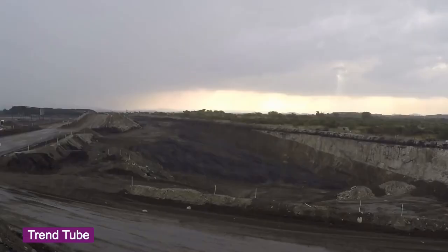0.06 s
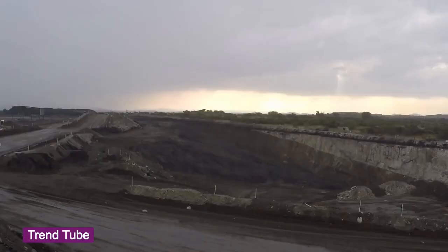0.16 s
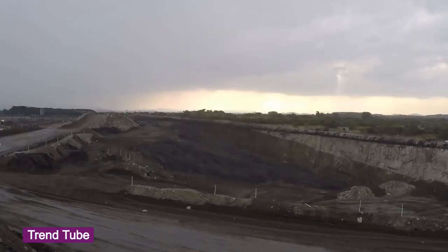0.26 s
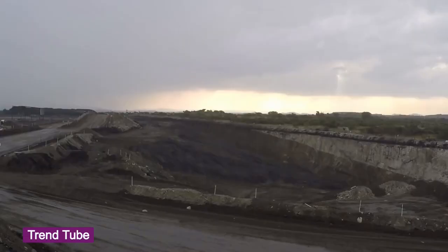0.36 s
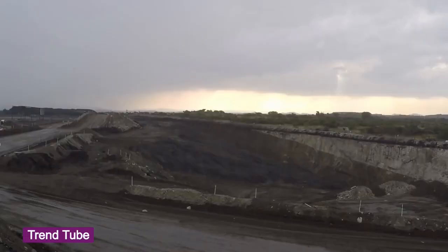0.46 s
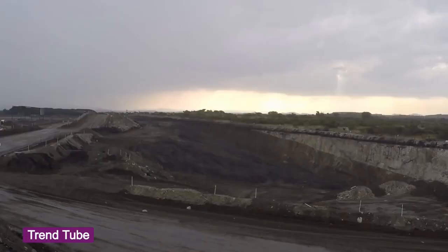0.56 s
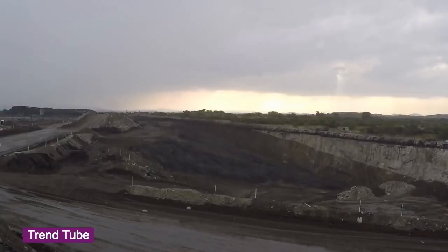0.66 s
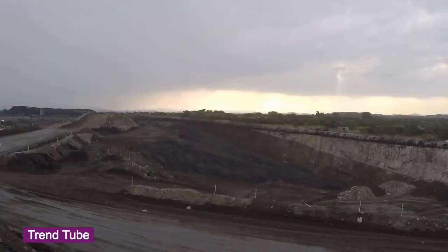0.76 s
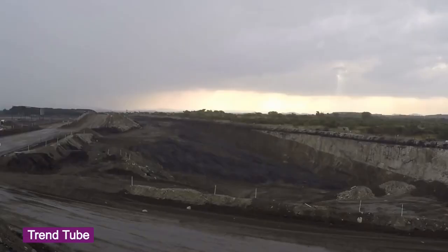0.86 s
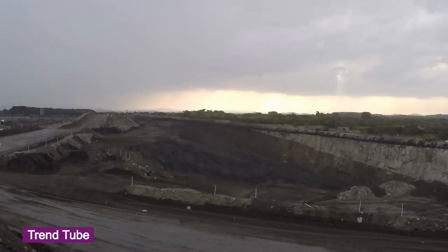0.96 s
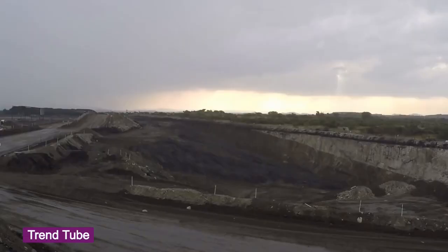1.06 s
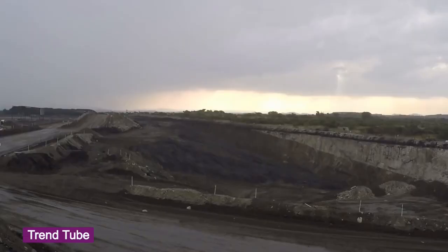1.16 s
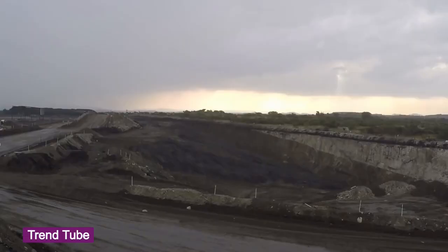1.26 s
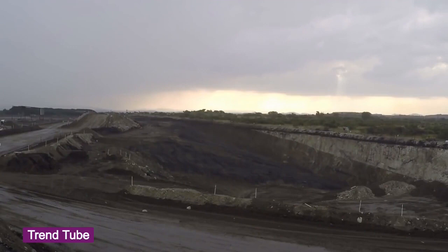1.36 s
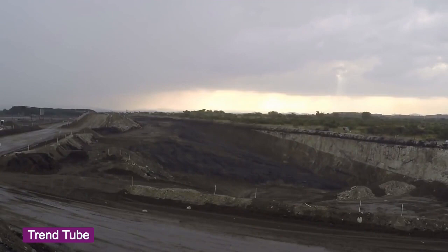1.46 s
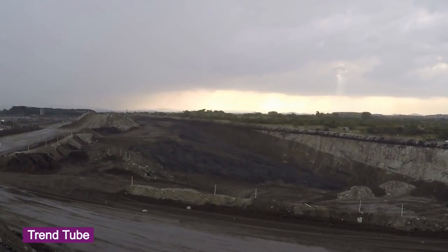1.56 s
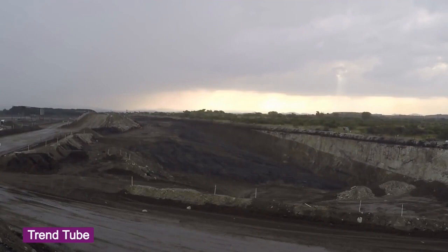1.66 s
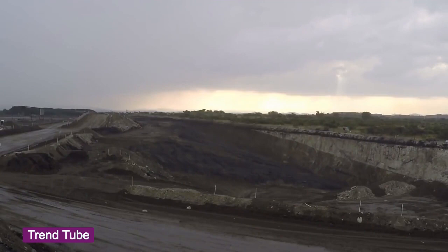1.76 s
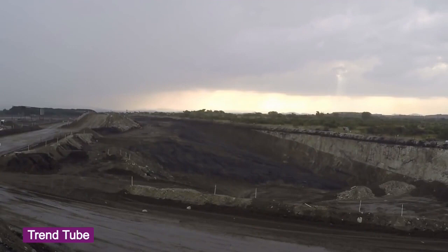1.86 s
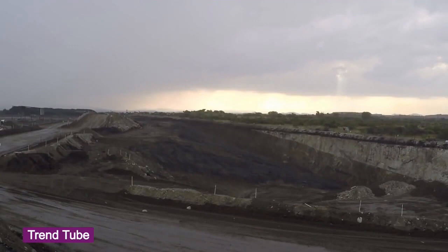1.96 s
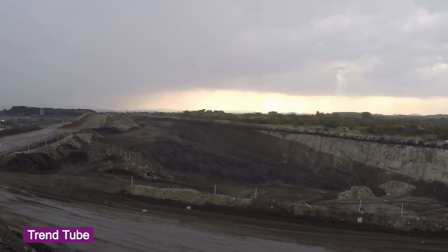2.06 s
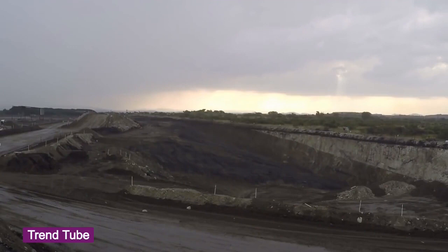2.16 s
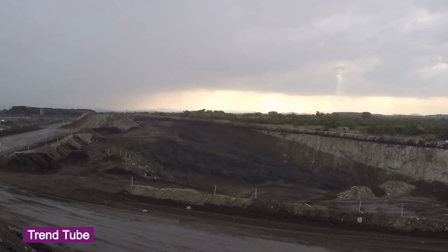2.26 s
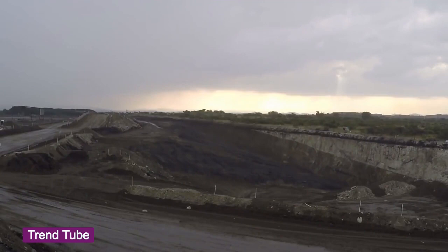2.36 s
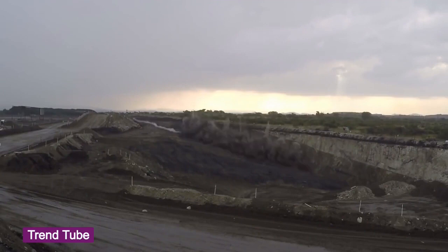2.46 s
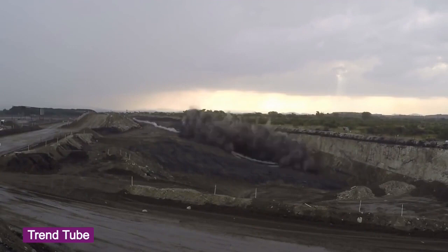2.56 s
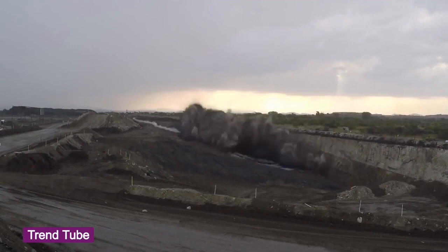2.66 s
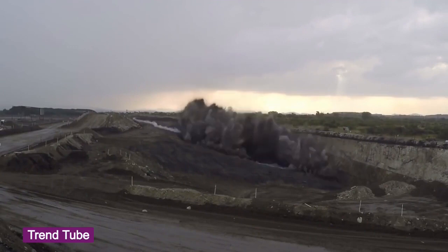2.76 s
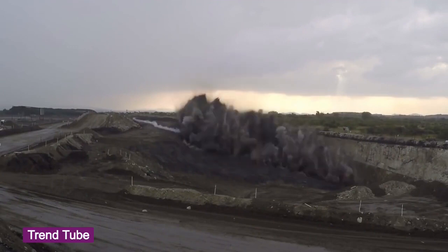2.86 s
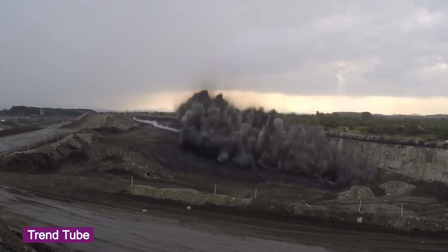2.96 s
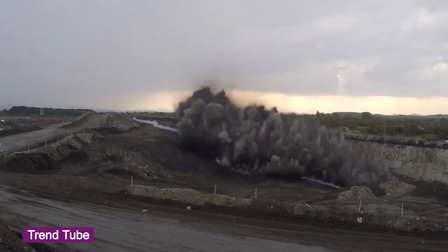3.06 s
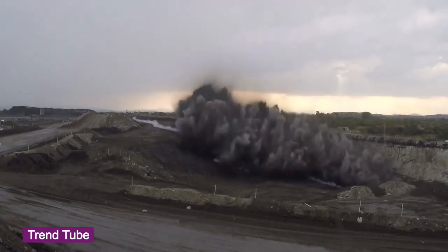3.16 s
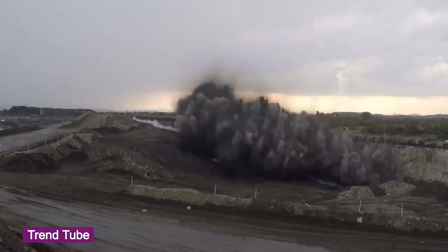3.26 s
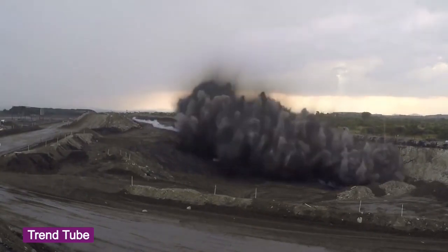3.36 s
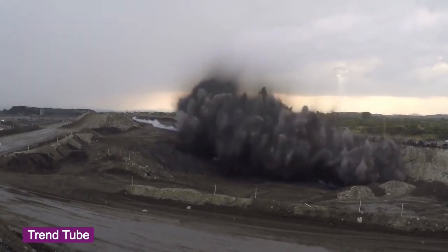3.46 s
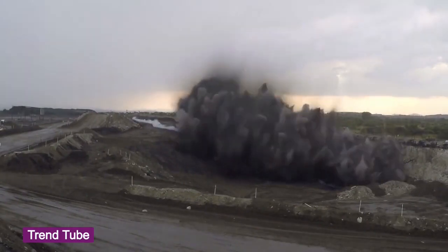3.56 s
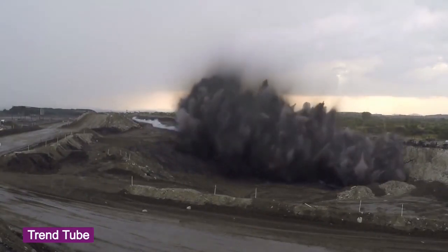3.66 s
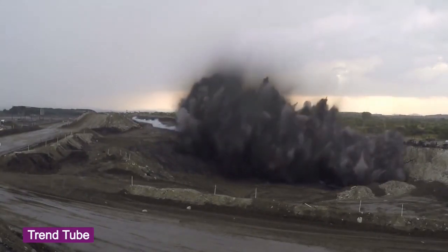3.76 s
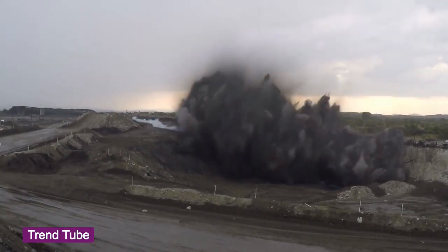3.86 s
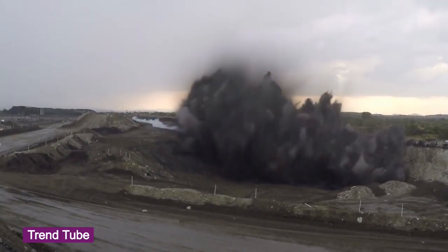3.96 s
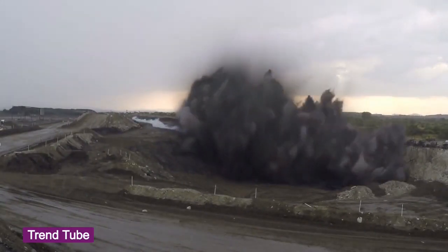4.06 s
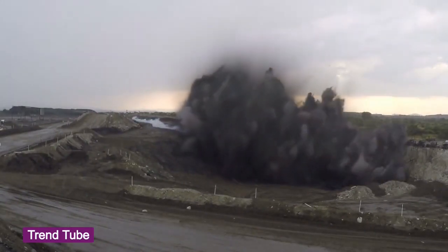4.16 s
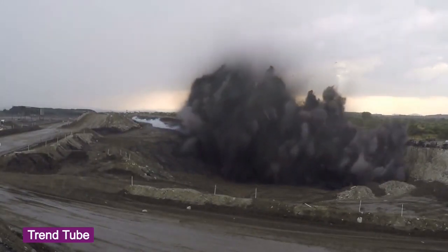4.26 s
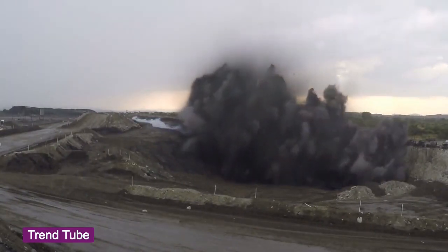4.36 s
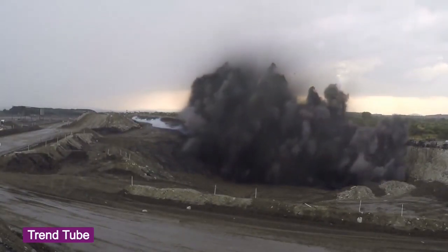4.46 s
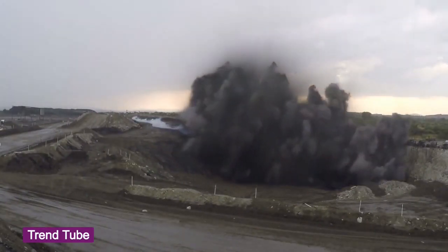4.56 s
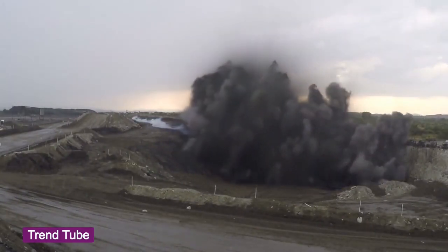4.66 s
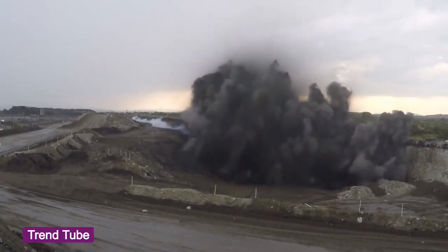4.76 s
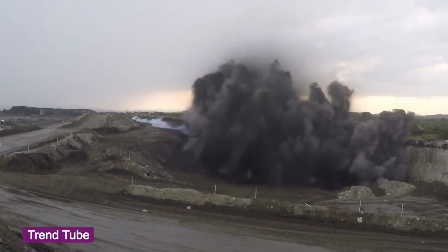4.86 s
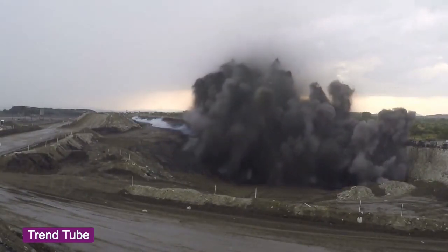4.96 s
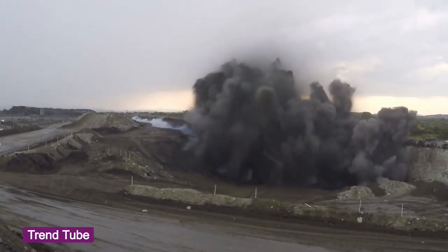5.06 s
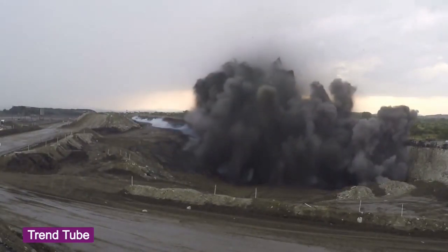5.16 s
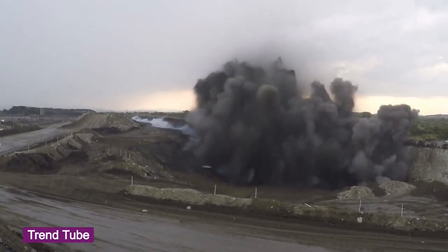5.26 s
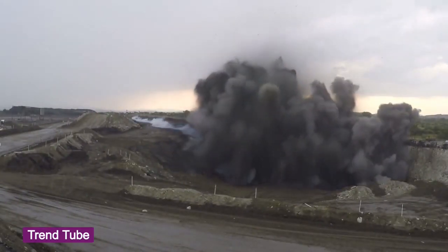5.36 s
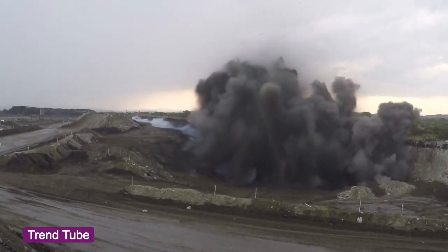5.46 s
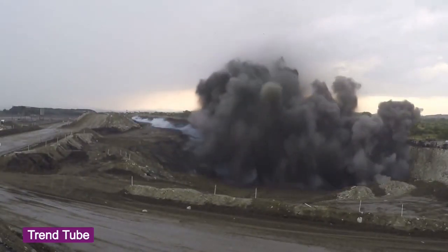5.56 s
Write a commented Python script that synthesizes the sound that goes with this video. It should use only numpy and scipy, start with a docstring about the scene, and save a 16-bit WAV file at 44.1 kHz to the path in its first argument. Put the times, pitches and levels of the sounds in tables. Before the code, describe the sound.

Outdoor mine blast heard through a hard plastic housing. Hollow raindrop ticks sit on a constant wash with a very faint, far siren. A flattened thud brightens to a crack, then cuts off along with the background. The stand shudders deeply; rapid air shocks clatter the case over booming roar, which dies away. Sparse drops and tiny drips remain while falling stones swell to the end.

```python
"""Drops tick on a plastic case over a steady hiss, fine spray and a faint, far siren; an overloaded bang breaks in.
Hiss, spray, siren and bang stop dead together; a tremor follows, then rattling shocks, a dying roar and a rush.
It is a blast in an open-pit mine, heard from a camera in a plastic case in light rain.
Drops ring case modes; the bang is clipped noise; the ground wave sways the stand; the air shocks of
single holes rattle the case; shaped noise makes the roar and the swelling rush of falling rock."""
import sys
import numpy as np
from scipy import signal
from scipy.fft import rfft, irfft, next_fast_len
from scipy.io import wavfile
from scipy.ndimage import uniform_filter1d

SR = 44100
rng = np.random.default_rng(int(sys.argv[2]) if len(sys.argv) > 2 else 0)


def dump_mix(stems):
    """Bounce the given channels to the path in sys.argv[1] as a 16-bit WAV at rate SR."""
    frames = np.atleast_2d(stems).T  # one column per channel
    limited = np.clip(frames, -1, 1)  # hard clip at full scale
    pcm = np.round(limited * 32767).astype(np.int16)
    wavfile.write(sys.argv[1], SR, pcm)


N = 247401
T = np.arange(N) / SR  # s

BANG_END_S = 2.596
AIR_START_S, FIRING_S = 3.08, 0.5  # the air wave arrives, and lasts while the holes fire
SURGE_S = 0.065  # time constant: the first holes are the loudest

# relative spectrum of heavy rock noise: (frequency [Hz], density [dB per Hz])
ROAR_SPECTRUM = [(60, -7.5), (130, 5), (220, -0.5), (340, -2.5), (650, -7.5), (1000, -14), (1400, -43),
                 (4000, -45)]
# relative spectrum of stony noise: (frequency [Hz], density [dB per Hz])
RUSH_SPECTRUM = [(200, -18.5), (700, -3.5), (1150, 5.5), (2500, 4.5), (5000, 0), (8000, -4.5), (11000, -17),
                 (16000, -37)]


def amp(db):
    """Decibels to gain."""
    return 10 ** (np.asarray(db) / 20)


def evened(x):
    """Scales to rms 1."""
    return x / np.sqrt(np.mean(x ** 2) + 1e-20)


def add(mix, start_s, sound):
    """Mixes a sound in at start_s, in place."""
    part = mix[round(start_s * SR):][:len(sound)]
    part += sound[:len(part)]


def colour(x, spectrum):
    """Filters x by a spectrum, interpolated over log frequency, and scales to rms 1."""
    hz, db = np.transpose(spectrum)
    size = next_fast_len(N)
    bin_hz = np.fft.rfftfreq(size, 1 / SR)
    gain = amp(np.interp(np.log(bin_hz + 1), np.log(hz + 1), db))
    return evened(irfft(rfft(x, size) * gain, size)[:N])


def noise(spectrum):
    """Coloured noise, rms 1."""
    return colour(rng.standard_normal(N), spectrum)


def swaying(spectrum, span_s):
    """Coloured noise levelled by its own short-term power, so its strength stays nearly even."""
    x = noise(spectrum)
    size = max(int(span_s * SR), 8)
    power = uniform_filter1d(uniform_filter1d(x ** 2, size), size)
    return x / np.sqrt(power + 0.033)


def wobble(hz, wander_hz):
    """A low sine of rms 1 whose pitch wanders slowly; wander_hz is rms."""
    drift = noise([(1, 0), (12, 0), (30, -40), (100, -120)])
    cycles = np.cumsum(hz + wander_hz * drift) / SR
    return np.sqrt(2) * np.sin(2 * np.pi * (cycles + rng.random()))


def patter(per_s, spread_db):
    """Random impacts, many small and a few large, rms 1."""
    size = amp(spread_db * np.minimum(rng.exponential(1, N), 4))
    struck = rng.random(N) < per_s / SR
    return evened(size * rng.standard_normal(N) * struck)


def envelope(start_s, db, attack_s, hold_s, fall_db_per_s):
    """A gain that rises linearly, holds and dies away exponentially."""
    since_s = T - start_s
    falling_s = np.maximum(since_s - attack_s - hold_s, 0)
    return np.clip(since_s / attack_s, 0, 1) * amp(db - fall_db_per_s * falling_s)


def through_case(x):
    """Airborne sound rings the walls of the case: damped cosines, convolved at unit energy."""
    # wall resonances: (frequency [Hz], bandwidth [Hz], relative peak [dB])
    walls = [(870, 200, -1.5), (1590, 380, -5), (1832, 88, -3.5), (2030, 160, -4.5), (2560, 115, 4),
             (2837, 170, 2.5), (3560, 204, 1), (4080, 210, -7), (4600, 93, -4.5), (5550, 58, -13.5),
             (6460, 100, -40.5), (7840, 130, -68)]
    t = T[:SR // 20]
    hz, width_hz, db = np.transpose(walls)[:, :, None]
    modes = amp(db) * width_hz * np.exp(-np.pi * width_hz * t) * np.cos(2 * np.pi * hz * t)
    response = modes.sum(0)
    return signal.oaconvolve(x, response / np.linalg.norm(response))[:len(x)]


def knock(centre_hz, octaves=0.42, scatter_db=3.0, splash_db=-20):
    """A drop on the case: its place decides which modes ring (peak 1); the water splashes briefly."""
    # case modes before scatter and detuning: (frequency [Hz], relative level [dB], t60 of the early decay [s])
    case_modes = [(780, -6, .004), (1130, 9, .008), (1400, -12, .004), (1920, -1, .01), (2280, 0, .007),
                  (2750, 0, .008), (3100, -7, .006), (3630, 0, .006), (4200, -2, .006), (5100, -13, .005),
                  (6980, -15, .006), (8600, -15, .005)]
    t = T[:SR // 10]
    hz, db, t60_s = np.transpose(case_modes)[:, :, None]
    luck, detune = rng.standard_normal((2, len(case_modes), 1))
    nearness = 1 / (1 + (np.log2(hz / centre_hz) / octaves) ** 2)
    weight = amp(db + scatter_db * luck) * nearness
    # a quick decay, then a faint longer ring
    fall = amp(-60 * t / t60_s) + amp(-31 - 12 * t / t60_s)
    onset = 1 - np.exp(-t / 0.0003)
    modes = weight * fall * np.sin(2 * np.pi * hz * (1 + 0.025 * detune) * t)
    ring = onset * modes.sum(0)
    splash = signal.lfilter([1], [1, -0.6], rng.standard_normal(len(t))) * np.exp(-t / 0.001)
    return ring / abs(ring).max() + amp(splash_db) * onset * splash


def hiss(level_db=-40, grain=0.41):
    """A steady wash: white noise and dense random impacts through one spectrum."""
    # relative: (frequency [Hz], density [dB per Hz])
    hiss_spectrum = [(10, 7), (22, 1.5), (53, -2), (90, -10), (216, -3), (300, -5.5), (420, 1), (1000, -3),
                     (1600, -3), (3500, -12), (6700, -17), (10000, -26), (16000, -37.5)]
    grains = patter(per_s=2300, spread_db=6.5)
    return amp(level_db) * colour(rng.standard_normal(N) + grain * grains, hiss_spectrum)


def spray(level_db=-62, per_s=14, fizz_s=0.0034):
    """Tiny droplets burst with short, bright ticks: noise under exponential decays."""
    # relative: (frequency [Hz], density [dB per Hz])
    spray_spectrum = [(1500, -24.5), (4000, -4.5), (7000, 1), (11000, -4), (16000, -7.5)]
    hits = abs(patter(per_s, spread_db=1.5))
    bursts = signal.lfilter([1], [1, -np.exp(-1 / (fizz_s * SR))], hits)
    return amp(level_db) * colour(bursts * rng.standard_normal(N), spray_spectrum)


def siren(level_db=-52, top_s=0.124, sweeps_per_s=6.224):
    """A far warning siren, almost lost in the hiss: three swept harmonics coloured by its horn."""
    # one sweep: (share of the cycle, fundamental [Hz])
    yelp = [(0, 1529), (.1, 1199), (.3, 722.6), (.45, 945), (.58, 1160), (.73, 1334), (1, 1486)]
    # (frequency [Hz], relative gain [dB])
    horn = [(500, -20), (1100, -14), (1310, 7), (1420, -15.5), (1900, -6.5), (2200, -18), (2550, -4),
            (2900, -16), (3650, -5), (4500, -36)]
    hz = np.interp((T - top_s) * sweeps_per_s % 1, *np.transpose(yelp))
    phase = 2 * np.pi * np.cumsum(hz) / SR
    tone = np.sin(phase) + 0.36 * np.sin(2 * phase) + 0.81 * np.sin(3 * phase)
    return amp(level_db) * colour(tone, horn)


def drizzle(level_db=-51, spread_db=4, centre_hz=2400, count=36):
    """Small drops land on the case at random moments and places, one in each equal time slot."""
    out = np.zeros(N)
    for turn, (size, place) in enumerate(rng.standard_normal((count, 2))):
        start_s = (turn + rng.random()) / count * N / SR
        drop = knock(centre_hz * 2 ** (np.tanh(place) / 2), splash_db=-11.5)
        add(out, start_s, amp(level_db + spread_db * size) * drop)
    return out


def raindrops():
    """The larger drops land on the case and ring its modes around a centre frequency."""
    # (time [s], level before the case limiter [dB], centre of the ringing modes [Hz])
    drops = [(0.1, -12, 3190), (0.9857, -18, 2130), (1.7893, -26, 6230), (1.841, -25, 2340),
             (1.9602, -9.5, 2020), (2.0922, -5.5, 3370), (2.6102, -19, 2090), (2.6215, -15, 1840),
             (2.6835, -34.5, 2220), (2.8993, -5, 4030), (3.953, -39, 2400), (4.1217, -26, 2700),
             (4.394, -41, 2140), (4.46, -30, 2400), (4.5706, -20.5, 3270), (4.6777, -35.5, 2510),
             (5.0644, -36.5, 2510), (5.1372, -14.5, 2150), (5.2002, -26.5, 1700), (5.351, -41.5, 1090),
             (5.5006, -15, 3000), (5.507, -29, 3800), (5.5805, -28.5, 2570)]
    out = np.zeros(N)
    for start_s, db, centre_hz in drops:
        add(out, start_s, amp(db) * knock(centre_hz))
    return out


def bang(start_s=2.3834, ceiling=0.28, droop_hz=60):
    """A thud that brightens into a crack: three noise bands, overdriven until the tops are flat."""
    # relative, all three: (frequency [Hz], density [dB per Hz])
    thud_spectrum = [(30, -25.5), (150, -27), (260, -10), (330, -2.5), (385, 1), (480, -10.5), (900, -40),
                     (3000, -69)]
    body_spectrum = [(200, -34.5), (500, -8.5), (690, 0.5), (930, -1), (1100, -7), (1300, -3), (1900, -6),
                     (2600, -21.5), (6000, -47)]
    crack_spectrum = [(100, -28.5), (400, -6.5), (800, -6.5), (1150, -9), (1800, 1.5), (3200, 3),
                      (6500, -2.5), (9000, -6), (12000, -25.5), (16000, -41)]
    thud_gain = envelope(start_s, db=-1.5, attack_s=0.001, hold_s=0.014, fall_db_per_s=249.5)
    body_gain = envelope(start_s, db=-1, attack_s=0.0082, hold_s=0.012, fall_db_per_s=155)
    crack_gain = envelope(start_s, db=-5.5, attack_s=0.016, hold_s=0.03, fall_db_per_s=114.5)
    pressure = thud_gain * swaying(thud_spectrum, span_s=0.01)
    pressure += body_gain * swaying(body_spectrum, span_s=0.023)
    pressure += crack_gain * noise(crack_spectrum)
    flat = ceiling * np.tanh(pressure / ceiling)
    return signal.lfilter(*signal.butter(1, droop_hz, "high", fs=SR), flat)  # the flat tops sag


def afterring():
    """What follows the bang's sudden end: a brief ring of the case and a faint low noise tail."""
    ring_gain = envelope(BANG_END_S, db=-50, attack_s=0.001, hold_s=0.003, fall_db_per_s=418.5)
    tail_gain = envelope(BANG_END_S, db=-56, attack_s=0.001, hold_s=0.003, fall_db_per_s=92)
    ring = colour(through_case(rng.standard_normal(N)), RUSH_SPECTRUM)
    return ring_gain * ring + tail_gain * noise(ROAR_SPECTRUM)


def tremor(start_s=2.683, judder_db=-11):
    """The ground wave outruns the air wave and sways the camera stand; the faster sway dies first."""
    # sway of the stand: (frequency [Hz], relative level [dB], extra fall [dB per s])
    stand = [(45.2, -3.5, 10), (80.66, -3, 47)]
    # relative: (frequency [Hz], density [dB per Hz])
    judder_spectrum = [(12, -33), (30, 0.5), (45, 0.5), (80, 6.5), (100, -12), (130, -23.5), (250, -36),
                       (550, -40), (2000, -49), (6000, -69.5)]
    since_s = np.maximum(T - start_s, 0)
    sway = sum(amp(db - fall * since_s) * wobble(hz, wander_hz=3.75) for hz, db, fall in stand)
    judder = amp(judder_db) * swaying(judder_spectrum, span_s=0.017)
    shake = envelope(start_s, db=-22.5, attack_s=0.025, hold_s=0.027, fall_db_per_s=29.5)
    return shake * (sway + judder)


def weak_shocks(db=-30, spread_db=4, surge_db=7, count=26):
    """The lesser holes fire in uneven succession among the strong ones: rows of (time [s], strength [dB])."""
    start_s = AIR_START_S + FIRING_S * (np.arange(count) + rng.random(count)) / count
    surge = np.exp((AIR_START_S - start_s) / SURGE_S)
    strength_db = db + surge_db * surge + spread_db * rng.standard_normal(count)
    return list(zip(start_s, strength_db))


def shocks(ring_db=12, chatter=0.037, chatter_s=0.0014, direct_db=-5, thump_hz=52, thump_db=-15, thump_s=0.0088):
    """Each pressure front snaps against the case, makes it chatter and gives the microphone a low push."""
    # fronts of the strongest holes: (time [s], relative strength [dB])
    strong_shocks = [(3.0823, -3), (3.0875, -2), (3.0969, -10), (3.103, -8.5), (3.1388, -7), (3.1552, -15),
                     (3.1608, -8), (3.1816, -20), (3.2184, -8), (3.2623, -18.5), (3.2789, -16.5),
                     (3.296, -14), (3.3383, -19), (3.3623, -19), (3.4122, -14.5), (3.475, -19),
                     (3.4884, -11.5), (3.5295, -11), (3.547, -16), (3.6015, -16.5)]
    snaps, pushes = np.zeros(N), np.zeros(N)
    t = T[:SR // 10]
    thump = np.exp(-t / thump_s) * np.sin(2 * np.pi * thump_hz * t)
    for start_s, db in strong_shocks + weak_shocks():
        rattle = chatter * np.exp(-t / chatter_s) * rng.standard_normal(len(t))
        add(snaps, start_s, amp(db) * ((t == 0) + rattle))
        add(pushes, start_s, amp(db + thump_db) * thump)
    direct = uniform_filter1d(snaps, 2)
    return amp(ring_db) * through_case(snaps) + amp(direct_db) * direct + pushes


def air_wave(attack_s=0.006, echo_fall_db_per_s=22):
    """Gains of rumble, roar and rush: a surge, a plateau, a quick fall, and a slower echo of the pit."""
    # rows rumble, roar, rush: (firing gain [dB], opening surge [dB], fall [dB per s], echo re firing [dB])
    bands = [(-30.5, 8.5, 93, -6.5), (-41, 20.5, 79, -19.5), (-45, 17, 62, -13)]
    surge = np.exp(-np.maximum(T - AIR_START_S, 0) / SURGE_S)
    gains = []
    for db, surge_db, fall, echo_db in bands:
        direct = envelope(AIR_START_S, db + surge_db * surge, attack_s, FIRING_S, fall)
        echo = envelope(AIR_START_S, db + echo_db, attack_s, FIRING_S, echo_fall_db_per_s)
        gains.append(np.hypot(direct, echo))
    return np.array(gains)


def landing(start_s=4.16, rise_s=1.46, power=2.02):
    """Gains of rumble, roar and rush: landing rock builds as a power of time over the quiet pit."""
    # rows rumble, roar, rush: (gain after rise_s [dB], gain of the quiet pit [dB])
    bands = [(-49.5, -59), (-68, -84.5), (-55.5, -82)]
    swell = (np.maximum(T - start_s, 0) / rise_s) ** power
    return np.array([np.hypot(amp(db) * swell, amp(quiet_db)) for db, quiet_db in bands])


def blast_and_rockfall(boom_hz=53, boom_db=10, deep_db=-3):
    """Heaving rock rumbles and roars; countless stones make a rush that enters through the case."""
    # relative: (frequency [Hz], density [dB per Hz])
    rumble_spectrum = [(10, -12), (28, -4.5), (40, -13), (55, -5.5), (75, -15), (110, -25.5), (200, -45),
                       (500, -70)]
    rumble, roar, rush = np.hypot(air_wave(), landing())
    # the power favours the strong part of the rumble
    boom = amp(boom_db) * rumble ** 1.43 * wobble(boom_hz, wander_hz=5.7)
    deep = amp(deep_db) * rumble * swaying(rumble_spectrum, span_s=0.078)
    stones = through_case(0.49 * rng.standard_normal(N) + 0.5 * patter(per_s=6500, spread_db=8.5))
    boulders = 0.62 * rng.standard_normal(N) + 0.58 * patter(per_s=660, spread_db=5.5)
    return boom + deep + roar * colour(boulders, ROAR_SPECTRUM) + rush * colour(stones, RUSH_SPECTRUM)


def drips():
    """Water drips close by: each is one low, decaying sine."""
    # (time [s], initial level before the case limiter [dB], frequency [Hz], t60 [s])
    drip_notes = [(2.803, -50, 538, .07), (3.004, -48.5, 536, 0.074), (4.538, -62, 537, 0.094),
                  (4.954, -49, 893, 0.073), (5.114, -53, 724, .03), (5.353, -54, 604, 0.065)]
    out, t = np.zeros(N), T[:SR // 5]
    for start_s, db, hz, t60_s in drip_notes:
        add(out, start_s, amp(db - 60 * t / t60_s) * np.sin(2 * np.pi * hz * t))
    return out


def scene(ceiling=0.14):
    """Hiss, spray, siren and bang stop together; all other sounds share a soft limiter; two equal channels."""
    cut = np.exp(-np.maximum(T - BANG_END_S, 0) / 0.001)
    opening = cut * (hiss() + spray() + siren() + bang())
    case = raindrops() + drips() + drizzle() + afterring() + tremor() + shocks() + blast_and_rockfall()
    case = case / (1 + (case / ceiling) ** 4) ** (1 / 4)
    return np.tile(opening + case, (2, 1))


def record(dry, edge_hz=16300):
    """Limits the band with a linear-phase low-pass."""
    lowpass = signal.firwin(511, edge_hz, window=("kaiser", 9), fs=SR)
    return signal.oaconvolve(dry, lowpass[None], "same")


dry = scene()
out = record(dry)
dump_mix(out)
```